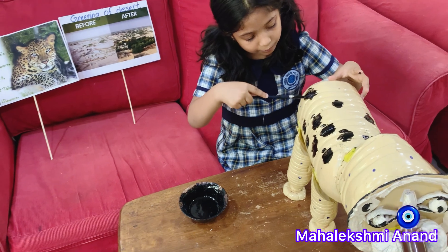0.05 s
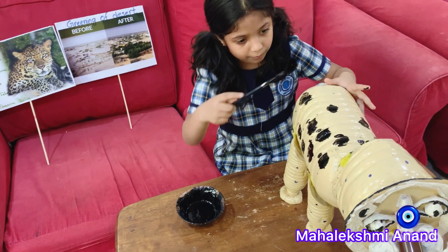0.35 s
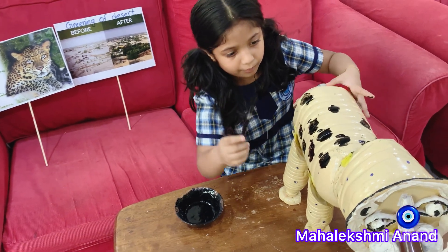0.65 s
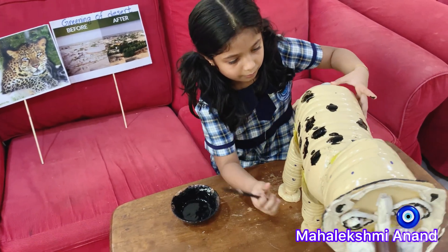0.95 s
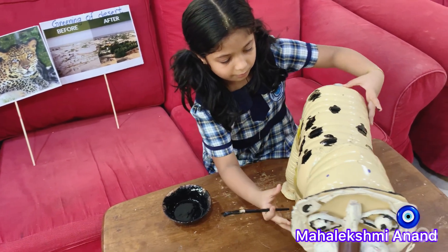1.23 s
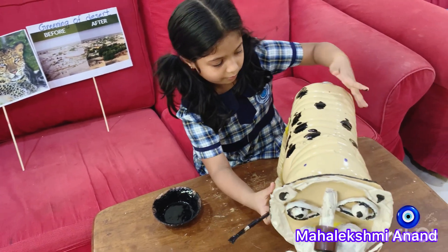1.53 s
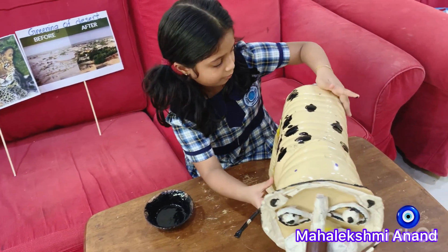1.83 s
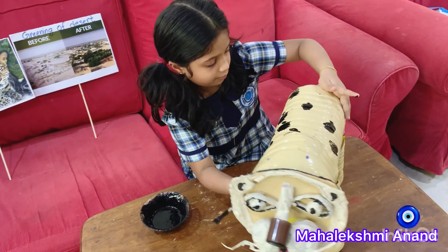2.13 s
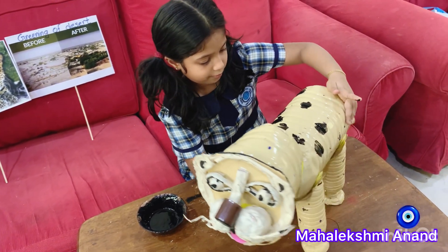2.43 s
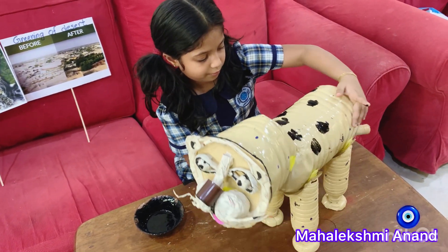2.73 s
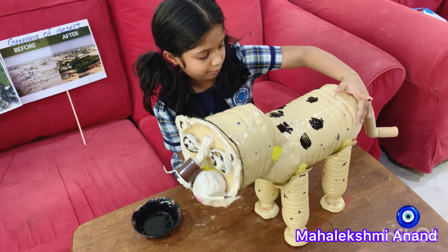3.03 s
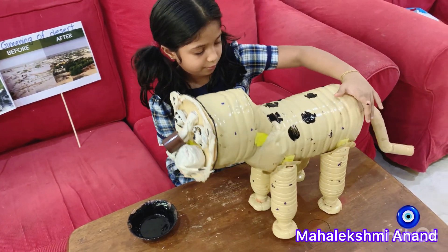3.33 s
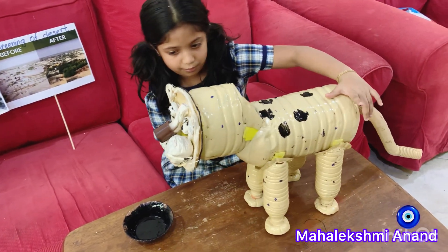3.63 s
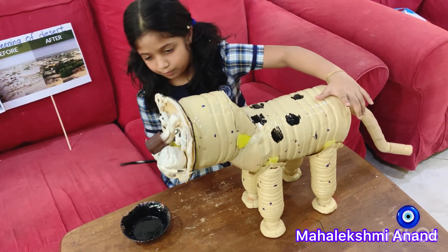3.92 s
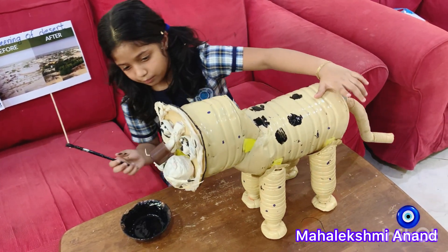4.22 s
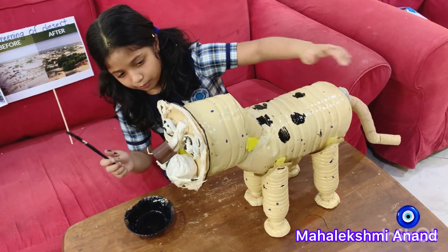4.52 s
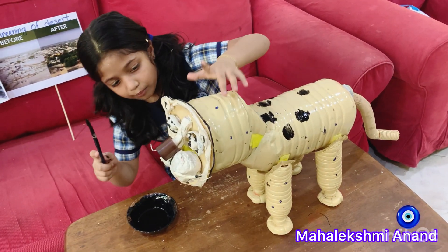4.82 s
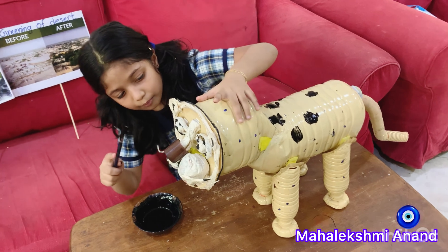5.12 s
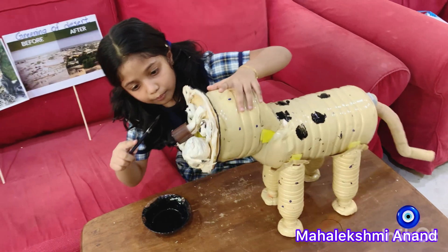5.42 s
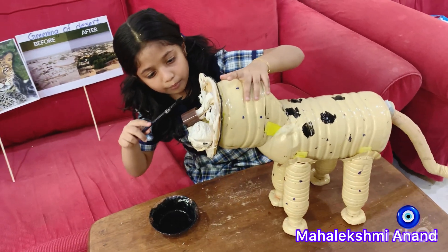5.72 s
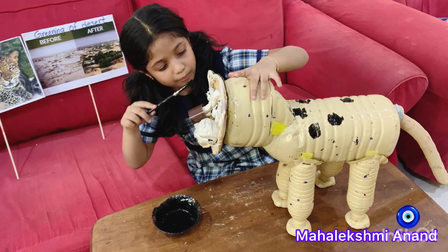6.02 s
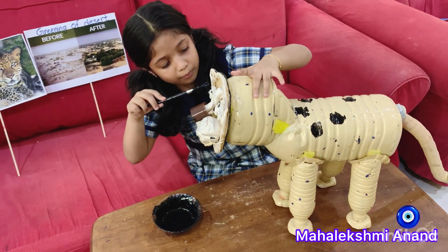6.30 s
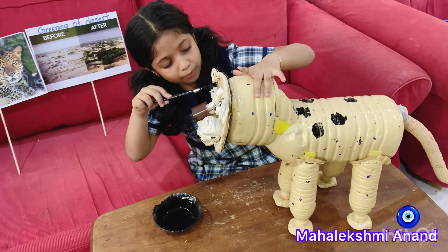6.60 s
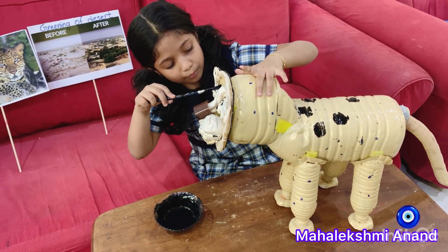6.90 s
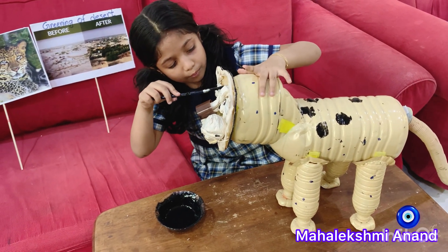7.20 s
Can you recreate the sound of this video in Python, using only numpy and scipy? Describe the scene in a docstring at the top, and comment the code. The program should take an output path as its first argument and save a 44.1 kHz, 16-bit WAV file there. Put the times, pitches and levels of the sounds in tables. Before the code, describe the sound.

A hollow sculpture of plastic bottles is turned on a wooden table. Faint ticks grow into a cluster of clicks, short scrapes and soft hollow knocks, then the thin plastic gives one loud crack. A tiny high squeak, more scraping and scattered taps follow before it thins to faint ticks. The sound is fairly close, in a slightly echoing room with low rumble and faint hum.

```python
"""A live, hard-floored room, where a hollow animal built of plastic bottles is turned on a wooden table.
Its thin walls buckle in the grip with clicks and crinkles, and soft knocks sound the air inside.
Its feet scrape on the wood and give tiny squeaks; fingers and a paintbrush tick faintly.
Underneath lies a bed of low room rumble and faint hum."""
import sys
import numpy as np
from scipy import signal
from scipy.fft import rfft, irfft, next_fast_len
from scipy.io import wavfile
from scipy.ndimage import uniform_filter1d, map_coordinates

SR = 44100
rng = np.random.default_rng(int(sys.argv[2]) if len(sys.argv) > 2 else 0)


def master(y):
    """Save y as 16-bit WAV."""
    cut = np.clip(np.atleast_2d(y).T, -1, 1)
    pcm = np.round(cut * 32767)  # scale
    wavfile.write(sys.argv[1], SR, pcm.astype(np.int16))


N = 324135

# room tone (frequency [Hz], level [dB])
RUMBLE_EQ = [(13, -42), (22, -24.5), (86, -8), (120, -13), (195, -10), (250, -19.5), (286, -8), (347, -24),
             (455, -25), (567, -35.5), (1780, -46), (1990, -45), (8690, -50), (13800, -42.5),
             (15000, -60.5)]
# hum partials (frequency [Hz], level [dB])
HUM_PARTIALS = [(49, -63), (87, -68), (290, -67)]
# fader ride of the fidgeting fingers and brush (time [s], level [dB])
FIDGET_RIDE = [(0, -59), (0.13, -84), (0.3, -63), (0.7, -59), (1.6, -75), (4.3, -69), (4.6, -82),
               (5.1, -65.5), (5.8, -65), (6.0, -86), (6.3, -73.5), (6.5, -88), (7.3, -91.5)]
# sharp contacts and wall snaps
# (time [s], strength [dB], brightness [dB], panel pitch [Hz], room send [dB])
CLICK_CUES = [(0.195, -48, -37, 2020, 2.5), (0.322, -51, -1.5, 3820, 1.5), (0.495, -50, -16, 2100, -0.5),
              (0.575, -65.5, 3, 4000, -10), (0.844, -45, -1.5, 1570, 1.5), (0.91, -44, 8.5, 2010, 0.5),
              (1.005, -37.5, -0.5, 4140, -20), (1.0368, -40, 6, 3500, -13), (1.0481, -32.5, -6, 1930, 4.5),
              (1.0619, -42, 6.5, 4090, -3), (1.143, -35.5, 9.5, 1670, 5), (1.2537, -43, 0, 3700, 6),
              (1.2759, -36.5, 2.5, 1880, 3.5), (1.6745, -42.5, -9, 2500, 7.5), (2.009, -56, 5, 2230, 5),
              (2.052, -43.5, -4, 1730, 7.5), (2.0672, -40, -0.5, 1730, 1.5), (2.134, -47.5, 3, 2650, 5.5),
              (2.268, -44.5, 0, 1740, 13.5), (2.2761, -41.5, -5, 2720, 19.5),
              (2.2861, -12, -3.5, 2880, -1.5), (2.3008, -20.5, -6, 3800, 2), (2.4988, -45, 1.5, 3930, 2.5),
              (2.608, -42.5, 6.5, 4130, -2), (2.751, -53, 16, 2090, 2), (3.7145, -27.5, 0, 4080, 2),
              (4.0344, -57.5, 11.5, 3220, -1.5), (4.0917, -50.5, -7, 3450, 4.5),
              (4.184, -59, -5.5, 2070, 6), (4.342, -62, 3.5, 1710, 3.5), (4.397, -54, -1.5, 1870, -0.5),
              (4.852, -58, 0, 3666, 5.5), (4.939, -47, -10, 1580, 5), (4.9592, -33.5, 1.5, 1580, -3),
              (5.1293, -55.5, 8.5, 3830, -1.5), (5.4473, -45, -3.5, 3950, 1.5),
              (5.591, -42.5, -0.5, 2420, 4), (5.655, -65.5, 14, 2540, -2), (5.6775, -58, 1, 2140, 8.5),
              (5.81, -51, -3, 1980, 2), (6.105, -66.5, 2.5, 1710, 1.5), (6.2463, -61.5, 2.5, 2100, 8),
              (6.31, -67, 3, 2100, 1)]
# the bottles' resonances in four bands, low to high (frequency [Hz], width [Hz], level [dB])
HOLLOW_MODES = [(270, 49, -2.5), (470, 500, -1)]
WALL_MODES = [(1420, 530, -8), (1733, 1000, 1.5), (2200, 1500, 1.5), (2650, 800, 0)]
SNAP_MODES = [(3475, 1900, -2), (3963, 220, 0.94)]
FIZZ_MODES = [(6060, 390, 7.5), (8170, 360, 0.5), (9930, 1600, 0.5), (14500, 600, 5)]
# narrow shell resonances that linger after a heavy blow (frequency [Hz], boost at full shell ring [dB])
SHELL_MODES = [(388, 4.5), (1723, 0), (1809, 4), (1981, 9.5), (2659, -1), (2724, -3), (2789, 3), (3413, 7),
               (3596, 11.5), (3951, 2), (4081, -7), (4177, -3.5), (4264, -11.5), (8247, 1)]
# dull knocks of the body on the table (time [s], level [dB], settled pitch [Hz], thud re air tone [dB])
BUMP_CUES = [(0.43, -41.5, 280, -15), (0.842, -39, 392, -5), (1.144, -29, 500, -12), (1.276, -29, 443, -10),
             (2.288, -19.5, 416, -14.5), (3.423, -35, 301, -11), (3.491, -34, 368, -5),
             (4.214, -41, 206, -10.5), (5.24, -43, 270, -9), (5.448, -39.5, 528, -21),
             (5.592, -30, 377.4, -5.5), (5.814, -35, 242, -17)]
# foot drags, finger rubs (start [s], length [s], friction [dB], hiss re friction [dB], scuff pitch [Hz])
STROKE_CUES = [(0.776, 0.022, -61.5, 0, 2330), (0.825, .12, -51.5, -2, 2166), (1.001, .11, -41, 4, 2032),
               (1.135, .06, -46, 2, 1846), (1.275, .025, -38, -5.5, 1998), (1.402, .08, -49, -13.5, 1604),
               (1.898, .1, -56.5, -10, 2000), (2.052, 0.12, -48, -2, 2103), (2.643, .125, -46, -4, 1830),
               (2.866, 0.11, -47, 1.5, 2386), (3.11, 0.039, -42.5, -6.5, 2200),
               (3.211, .2, -52.5, -3.5, 2055), (3.532, .04, -67, 2, 1998), (3.978, .09, -64.5, 2.5, 2259),
               (4.308, 0.055, -62, -15.5, 1796), (4.776, .02, -66.5, -5, 1500),
               (4.922, .025, -56.5, -7, 1533), (5.208, .08, -59.5, -8, 1723),
               (5.316, 0.021, -45.5, -4.5, 1898), (5.37, 0.043, -53, -15, 1892),
               (5.433, 0.031, -49, -10, 1920)]
# a stroke's three layers: midrange scrape, top hiss, cavity drone (frequency [Hz], level [dB])
SCRAPE_EQ = [(600, -29.5), (1000, -2.5), (1500, -1), (2300, 1.5), (3000, -6), (3800, -26.5)]
HISS_EQ = [(2400, -23.5), (3200, -0.5), (4200, 3.5), (5200, -9.5), (6400, -5.5), (8400, -20), (11000, -12),
           (14500, -22)]
CAVITY_EQ = [(95, -15.5), (150, -11.5), (280, 0.5), (400, 1), (520, -6), (750, -16), (1200, -37)]
# tiny plastic squeaks and one knock's brief pitched ring (peak time [s], fade time [s], pitch [Hz],
# glide [octaves per fade time], level [dB], overtone [dB], roughness [factor])
SQUEAK_AND_RING_CUES = [(1.357, 0.011, 1000, -0.013, -55, -15, 0.13),
                        (2.9227, 0.0032, 4186, 0.045, -23, -20, 0.1),
                        (2.943, 0.0098, 5620, 0.0035, -39.5, -7.5, 0.64),
                        (3.505, 0.0085, 740, -0.061, -60, -26, 1.23),
                        (4.96, 0.0012, 1497, 0.00013, -35.5, -0.5, 0.86),
                        (5.323, 0.002, 1924, -0.037, -32, -5.5, 0.52)]
# reverb decay (frequency [Hz], time to fall 60 dB [s])
ROOM_T60 = [(100, 0.45), (500, 0.64), (1400, 0.53), (3700, 0.48), (9000, 0.46), (15000, 0.27)]
# reverb colour (frequency [Hz], level [dB])
ROOM_EQ = [(100, 9), (400, 2), (750, 1), (1500, 0), (4000, -2.5), (8000, 3.5), (14000, -2.5)]
# stereo image of the room (frequency [Hz], left-right correlation [-1 to 1])
STEREO_LIKENESS = [(60, 0.86), (240, 0.89), (480, 0.61), (950, 0.07), (1900, -.05), (3800, 0.2),
                   (15000, -0.4)]
# colour of the microphone port (frequency [Hz], level [dB])
MIC_EQ = [(4350, -1.5), (5000, -4.5), (5700, -3), (6500, -3), (7250, -6.5), (8200, 4), (9200, -2),
          (10700, 0), (11950, -16), (13000, 2), (14100, -5.5), (15100, -25)]

MIDDLING_CLICK_DB, MIDDLING_STROKE_DB = -46.5, -50.5


def amp(db):
    """Decibels to gain."""
    return 10 ** (np.asarray(db) / 20)


def unit(x):
    """Scale to rms 1."""
    return x / np.sqrt(np.mean(x ** 2) + 1e-20)


def along(points, hz):
    """Read (Hz, value) points on a log frequency axis."""
    freqs, values = np.transpose(points)
    return np.interp(np.log(hz + 1), np.log(freqs + 1), values)


def wobble(rate):
    """A smooth random curve, rate knots a second."""
    knots = rng.standard_normal(int(N * rate / SR) + 4)
    return map_coordinates(knots, [np.arange(N) * rate / SR])


def filtered(x, response):
    """Pass x through a complex frequency response."""
    n = x.shape[-1]
    padded = next_fast_len(n + 4096)
    return irfft(rfft(x, padded) * response(np.fft.rfftfreq(padded, 1 / SR)), padded)[..., :n]


def eq(x, curve):
    """Shape x with a curve of (Hz, dB) points."""
    return filtered(x, lambda hz: amp(along(curve, hz)))


def bell(hz, centre_hz, width_hz, db):
    """Gain of a bell boost on a flat response."""
    return amp(db / (1 + (2 * (hz - centre_hz) / width_hz) ** 2))


def resonate(x, modes):
    """Ring x through parallel steep-sided resonances."""
    def band(f, hz, width):
        return (1j * f * width / (hz * hz - f * f + 1j * f * width)) ** 2
    return filtered(x, lambda f: sum(amp(db) * band(f, hz, width) for hz, width, db in modes))


def add(track, time, sound):
    """Mix a sound in at a time in seconds."""
    start = max(round(time * SR), 0)
    part = sound[..., :max(N - start, 0)]
    track[..., start:start + part.shape[-1]] += part


def diffuse(pair):
    """Two unrelated signals as two close microphones hear them: alike in the bass only."""
    def mid_side_gains(hz):
        angle = np.arccos(np.clip(along(STEREO_LIKENESS, hz), -1, 1)) / 2
        return np.array([np.cos(angle), np.sin(angle)])
    mid, side = filtered(pair, mid_side_gains)
    return np.array([mid + side, mid - side])


def room_tail(shell=0, build_s=0.00033, sparse=.4, merge_s=0.029, width_hz=28):
    """Early reflections merge into a smooth decay; shell (0-1) lets the bottles ring along."""
    t = np.arange(SR * 2 // 3) / SR
    echoes = rng.standard_normal((2, len(t)))
    if shell > 0:
        echoes = filtered(echoes, lambda f: np.prod(
            [bell(f, hz, width_hz, shell * db) for hz, db in SHELL_MODES], axis=0))
    spread = sparse * np.exp(-t / merge_s)
    flutter = np.interp(t, t[::64], rng.standard_normal(len(t[::64])))
    echoes *= np.exp(spread * flutter - spread ** 2)
    hz, when, spectrum = signal.stft(echoes, SR, nperseg=256)
    decay = amp(-60 * when / along(ROOM_T60, hz)[:, None])
    tail = signal.istft(spectrum * decay, SR, nperseg=256)[1][:, :len(t)]
    tail *= 1 - np.exp(-(t / build_s) ** 2)
    return diffuse(eq(tail / np.linalg.norm(tail[0]), ROOM_EQ))


def in_room(sound, tail, wet_db):
    """A centred mono sound followed by the room's stereo answer."""
    out = amp(wet_db) * signal.fftconvolve(sound[None], tail, axes=1)
    out[:, :len(sound)] += sound
    return out


def room_tone(rumble_db=-55):
    """The bed: steady low rumble and a slightly wavering hum."""
    t = np.arange(N) / SR
    rumble = unit(diffuse(eq(rng.standard_normal((2, N)), RUMBLE_EQ)))
    hum = np.zeros(N)
    for hz, db in HUM_PARTIALS:
        gain = np.sqrt(2) * amp(db + 1.5 * wobble(4))
        hum += gain * np.sin(2 * np.pi * hz * t + 1.2 * wobble(7))
    return amp(rumble_db) * rumble + hum


def slips(rate, scatter_db, clump_db=4, steady_s=0.043):
    """Tiny releases of friction come in uneven clumps, while the pull of the hand stays steady."""
    sizes = amp(scatter_db * np.clip(rng.standard_normal(N), -2, 2) + clump_db * wobble(70))
    train = (rng.random(N) < rate / SR) * sizes * rng.choice([-1, 1], N)
    power = np.abs(uniform_filter1d(train ** 2, int(steady_s * SR)))
    return train / np.sqrt(power + 1e-6)


def fidgeting(tail):
    """Fingertips and brush tick and rustle faintly on the plastic."""
    ride = amp(np.interp(np.arange(N) / SR, *np.transpose(FIDGET_RIDE)))
    touches = slips(rate=1000, scatter_db=6.0) * amp(8.5 * wobble(12))
    ticks = ride * unit(resonate(touches, WALL_MODES + SNAP_MODES))
    return in_room(ticks, tail, wet_db=2)[:, :N]


def crackle(t, peak_s=0.00076, flatness=0.75):
    """A split-second burst of tiny buckles with a nearly flat spectrum, as a mid and side pair."""
    swell = t / peak_s * np.exp(-t / peak_s)
    force = rng.standard_normal((2, len(t)))
    for _ in range(2):
        spectrum = rfft(force * swell)
        force = irfft(spectrum / (np.abs(spectrum) + 1e-9) ** flatness, len(t))
    return force / np.std(force, axis=1, keepdims=True)


def detuned(modes, scatter=.035):
    """No two spots on the bottles ring quite alike: each resonance shifts a little."""
    return [(hz * np.exp(scatter * rng.standard_normal()), width, db) for hz, width, db in modes]


def click_bands(db, bright_db, panel_hz, large_panel_hz=2000, hollow_db=-60.5, snap_db=-5, fizz_db=-8):
    """Balance of a click: stiff panels snap, hard contacts fizz, strong ones sound the hollow."""
    stiff_db = 5 * np.clip(np.log2(panel_hz / large_panel_hz), 0, 1)  # an octave up is small and stiff
    return ((HOLLOW_MODES, hollow_db + 0.56 * (db - MIDDLING_CLICK_DB)),
            (WALL_MODES, db - stiff_db),
            (SNAP_MODES, db + snap_db + stiff_db + .6 * bright_db),
            (FIZZ_MODES, db + fizz_db + bright_db))


def clicks(tails, stereo_width=0.71, panel_db=10, light_focus=0.082, panel_width=0.19, trim_db=0.5):
    """A wall buckles or a foot lands and rings one panel; the heaviest hit rings the whole shell."""
    out, t = np.zeros((2, N)), np.arange(SR // 40) / SR
    heaviest = np.argmax([cue[1] for cue in CLICK_CUES])
    shell_tail = room_tail(shell=0.86)
    for i, (time, db, bright_db, hz, wet_db) in enumerate(CLICK_CUES):
        boost_db = panel_db + light_focus * (MIDDLING_CLICK_DB - db)  # light taps favour their own panel
        force = filtered(crackle(t), lambda f: bell(f, hz, panel_width * hz, boost_db))
        mid, side = sum(amp(level + trim_db) * unit(resonate(force, detuned(modes)))
                        for modes, level in click_bands(db, bright_db, hz))
        tail = shell_tail if i == heaviest else tails[i % len(tails)]
        add(out, time, in_room(mid, tail, wet_db))
        add(out, time, stereo_width * np.array([side, -side]))  # the curved wall radiates unevenly
    return out


def bumps(tails, t60=0.06, attack_s=.001, table_hz=165, floor_hz=85, floor_db=-4,
          upper_ratio=1.8, upper_db=-12, bend=.2, relax_s=0.0059, push_db=-8, push_s=0.0014):
    """Soft blows thud on the table and sound the bottles' air, its pitch sinking as the dent relaxes."""
    out, t = np.zeros((2, N)), np.arange(SR // 6) / SR
    for i, (time, db, hz, thud_db) in enumerate(BUMP_CUES):
        pitch = hz * (1 + bend * np.exp(-t / relax_s))
        phase = 2 * np.pi * np.cumsum(pitch) / SR
        air = np.sin(phase) + amp(upper_db) * np.sin(upper_ratio * phase)
        thud = np.sin(2 * np.pi * table_hz * t) + amp(floor_db) * np.sin(2 * np.pi * floor_hz * t)
        ring = (air + amp(thud_db) * thud) * amp(-60 * t / t60)
        push = amp(push_db) * (1 - t / push_s) * np.exp(-t / push_s)
        blow = amp(db) * (ring + push) * (1 - np.exp(-t / attack_s))
        add(out, time, in_room(blow, tails[i % len(tails)], wet_db=-4))
    return out


def stroke_controls(attack_s=0.051, release_s=0.046, middling_drone_db=-58, drone_follow=0.59):
    """Each stroke swells, holds and fades: gains of friction, hiss and drone, and the scuff pitch."""
    t = np.arange(0, N, 32) / SR
    start, length, db, hiss_db, hz = np.transpose(STROKE_CUES)[:, :, None]
    fade = np.maximum(start - t, 0) / attack_s + np.maximum(t - start - length, 0) / release_s
    envelope = amp(-20 * fade) + 1e-9
    drone_db = middling_drone_db + drone_follow * (db - MIDDLING_STROKE_DB)
    gains = [np.linalg.norm(envelope * amp(level), axis=0) for level in (db, db + hiss_db, drone_db)]
    pitch = np.sum(envelope * hz, axis=0) / np.sum(envelope, axis=0)
    return [np.interp(np.arange(N) / SR, t, control) for control in gains + [pitch]]


def scuff(grains, centre_hz, width_octaves=0.25, boost_db=8):
    """The rubbed patch of wall favours a pitch that moves with the contact."""
    hz, when, spectrum = signal.stft(eq(grains, SCRAPE_EQ), SR, nperseg=256)
    octaves = np.log2((hz[:, None] + 1) / np.interp(when, np.arange(N) / SR, centre_hz))
    sweep = amp(boost_db * np.exp(-(octaves / width_octaves) ** 2))
    return unit(signal.istft(spectrum * sweep, SR, nperseg=256)[1][:N])


def scraping(tails):
    """Feet drag over the wood and fingers rub the plastic: slips excite the walls and the cavity."""
    friction, hiss, drone, centre_hz = stroke_controls()
    grains = slips(rate=1300, scatter_db=4.5)
    rub = friction * scuff(grains, centre_hz)
    rub += hiss * unit(eq(grains, HISS_EQ))
    rub += drone * unit(eq(grains, CAVITY_EQ))
    out, piece = np.zeros((2, N)), SR // 2
    for i, start in enumerate(range(0, N, piece)):  # the echoes change as the body turns
        add(out, start / SR, in_room(rub[start:start + piece], tails[i % len(tails)], wet_db=3))
    return out


def squeaks_and_ring(trim_db=8.5):
    """Tiny plastic squeaks and one knock's brief pitched ring: short tones with one overtone."""
    out, t = np.zeros((2, N)), np.arange(-SR // 40, SR // 40) / SR
    for time, fade_s, hz, glide, db, overtone_db, rough in SQUEAK_AND_RING_CUES:
        jitter = unit(uniform_filter1d(rng.standard_normal(len(t)), size=20))
        octaves = 2 * glide * np.tanh(t / fade_s / 2)
        pitch = hz * 2 ** octaves * (1 + 0.17 * rough * jitter)
        phase = 2 * np.pi * np.cumsum(pitch) / SR
        tone = np.sin(phase) + amp(overtone_db) * np.sin(2 * phase)
        blip = tone * amp(db + trim_db) / np.cosh(t / fade_s)
        add(out, time + t[0], in_room(blip, room_tail(), wet_db=1))
    return out


def scene():
    """The handling sits a touch right of centre, over the room tone."""
    tails = [room_tail() for _ in range(15)]  # each part of the animal meets the room differently
    handling = clicks(tails) + bumps(tails) + squeaks_and_ring() + scraping(tails) + fidgeting(tails[0])
    return handling * amp([[-.4], [.4]]) + room_tone()


def record(dry, ceiling=1.1, top_hz=15703):
    """The loudest crack clips; microphone colour and a brick-wall high cut follow."""
    clipped = np.clip(dry, -ceiling, ceiling)
    return filtered(eq(clipped, MIC_EQ), lambda hz: hz < top_hz)


dry = scene()
out = record(dry)
master(out)
```